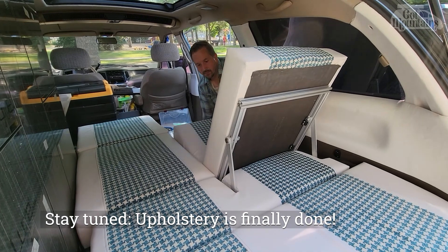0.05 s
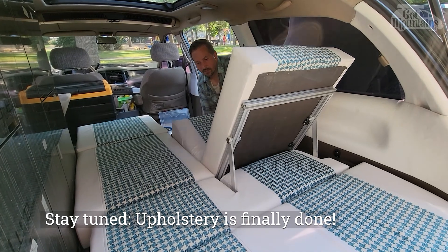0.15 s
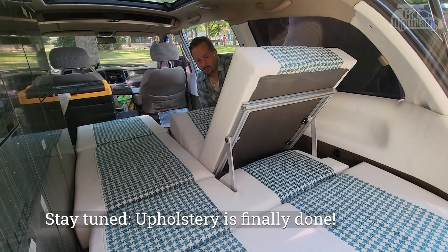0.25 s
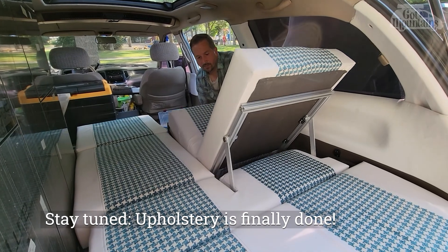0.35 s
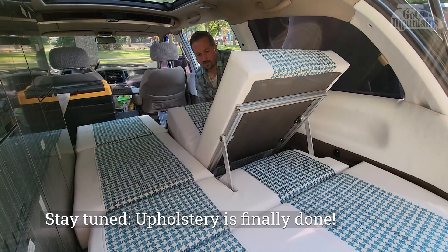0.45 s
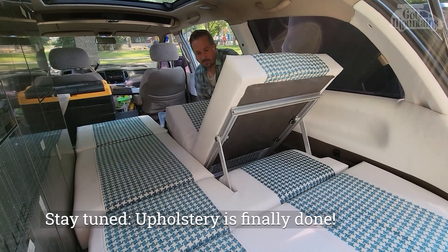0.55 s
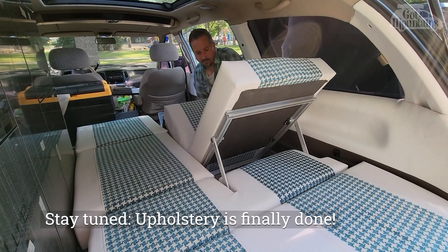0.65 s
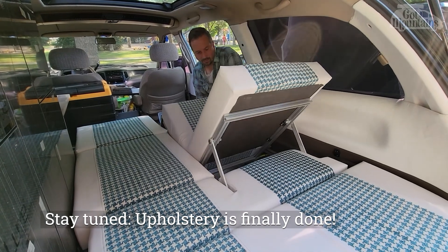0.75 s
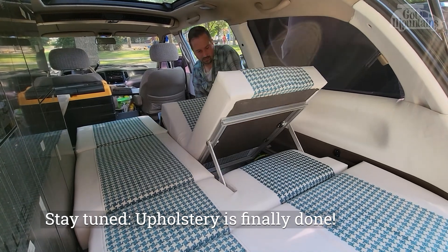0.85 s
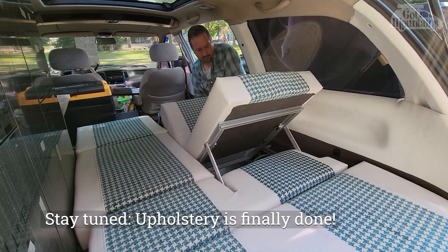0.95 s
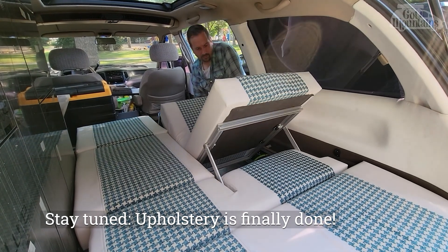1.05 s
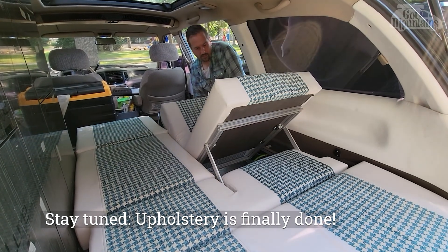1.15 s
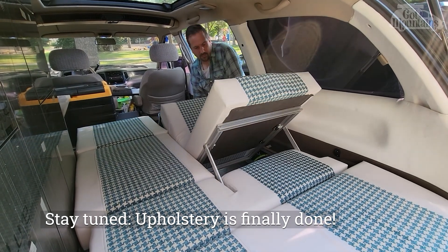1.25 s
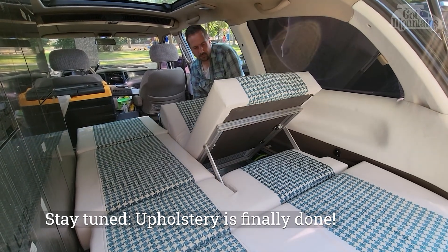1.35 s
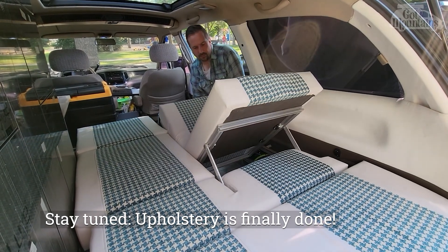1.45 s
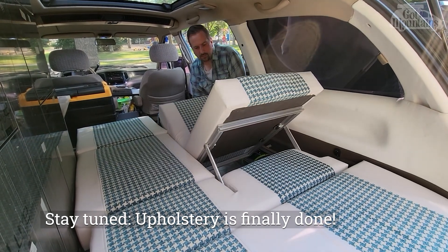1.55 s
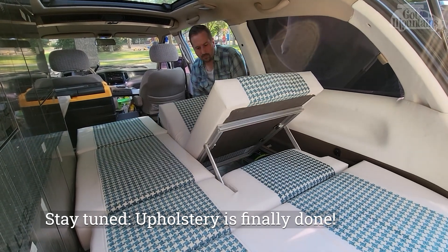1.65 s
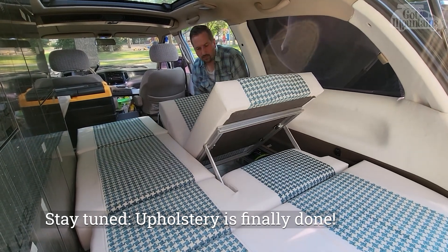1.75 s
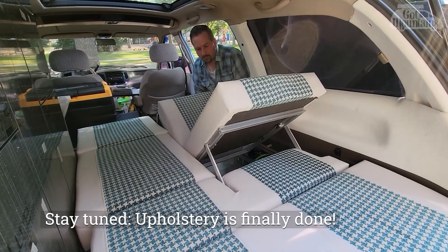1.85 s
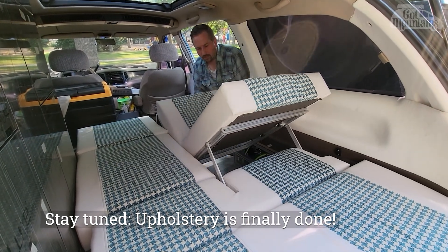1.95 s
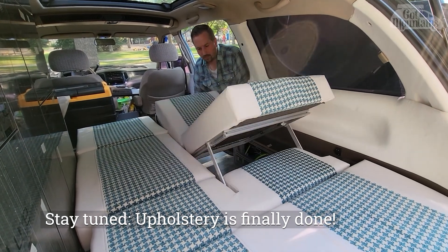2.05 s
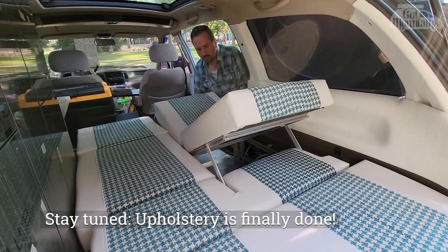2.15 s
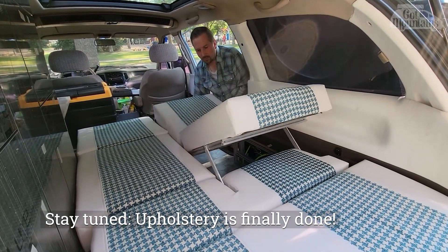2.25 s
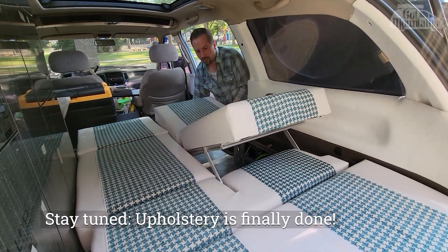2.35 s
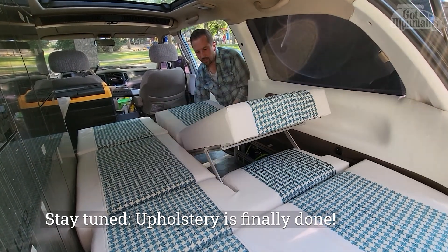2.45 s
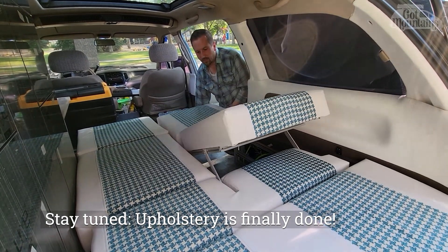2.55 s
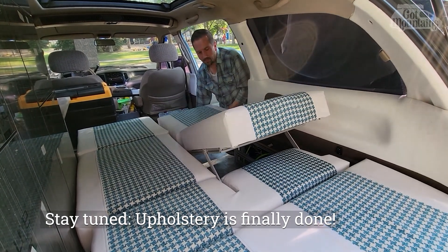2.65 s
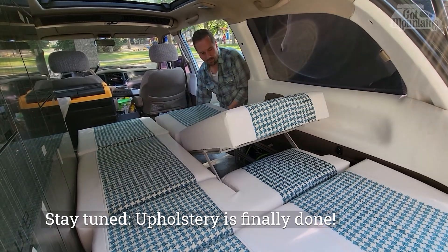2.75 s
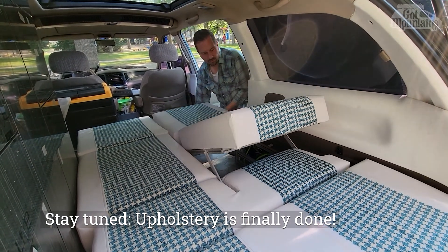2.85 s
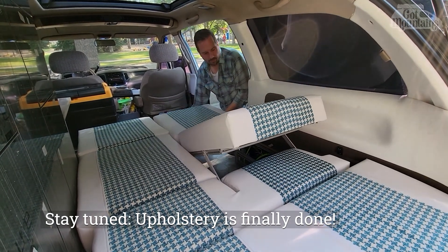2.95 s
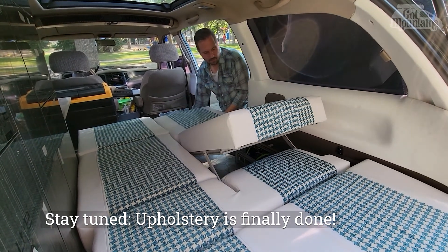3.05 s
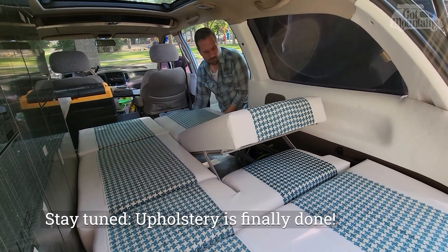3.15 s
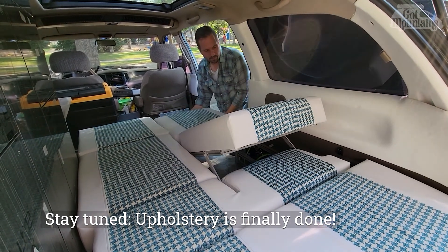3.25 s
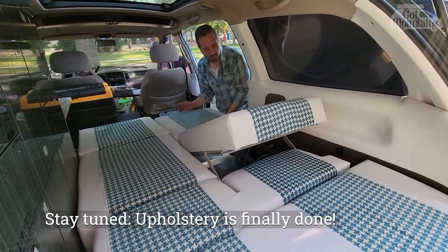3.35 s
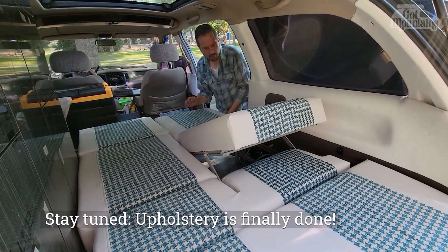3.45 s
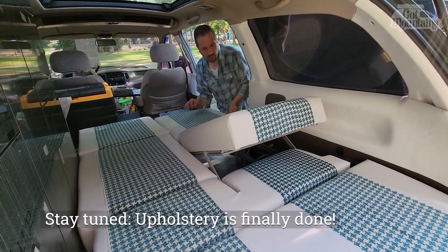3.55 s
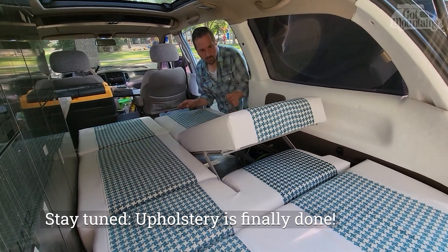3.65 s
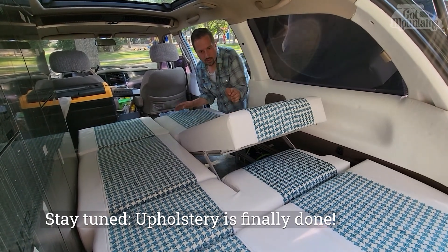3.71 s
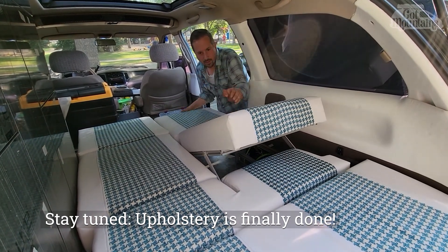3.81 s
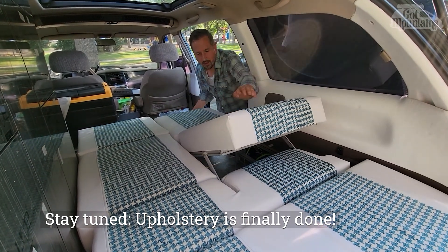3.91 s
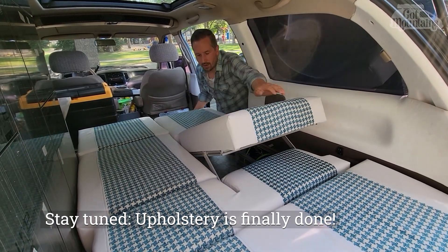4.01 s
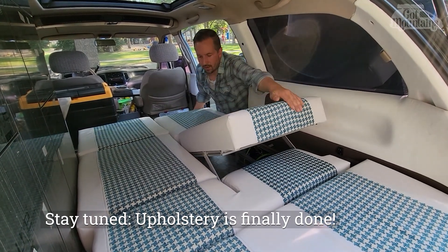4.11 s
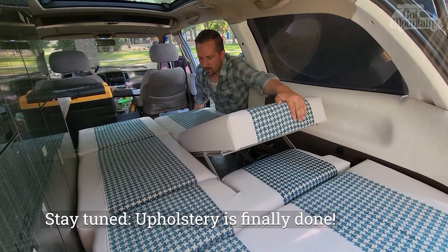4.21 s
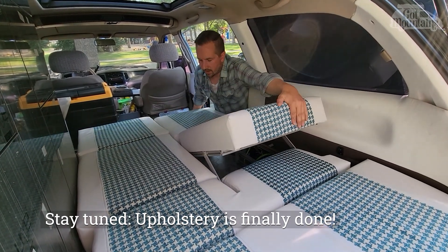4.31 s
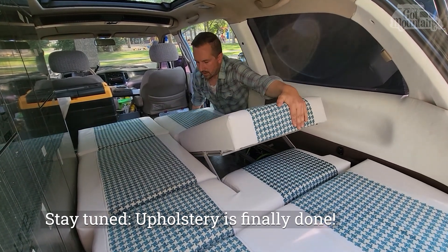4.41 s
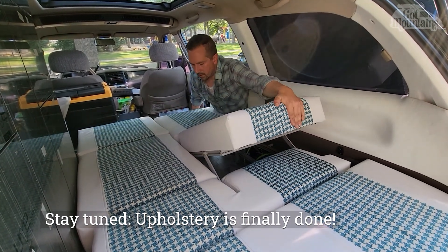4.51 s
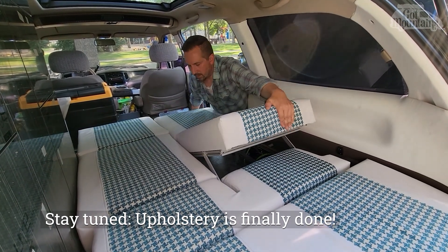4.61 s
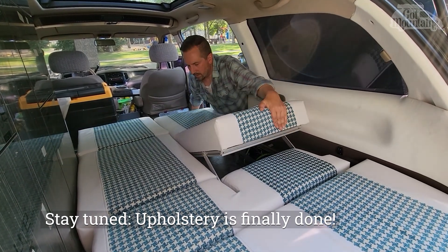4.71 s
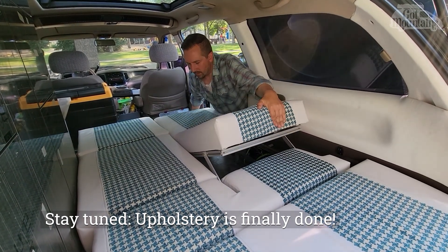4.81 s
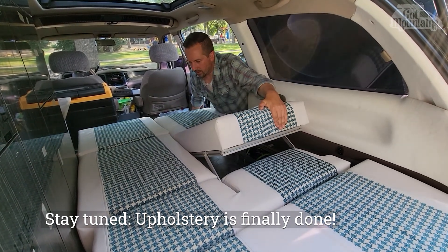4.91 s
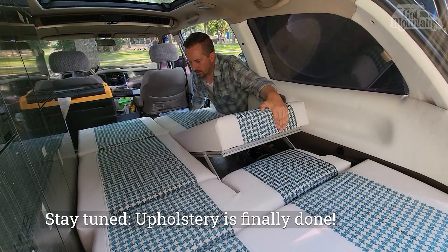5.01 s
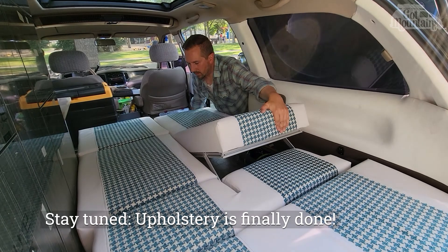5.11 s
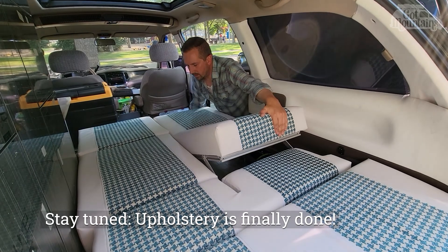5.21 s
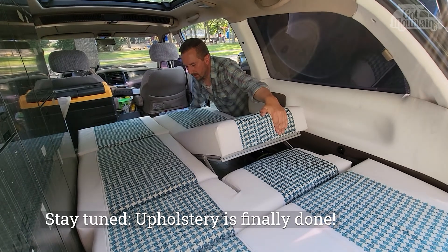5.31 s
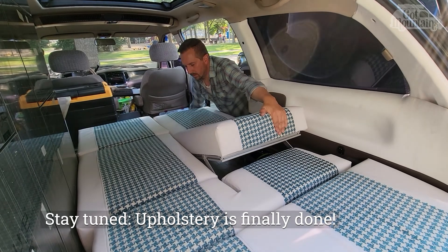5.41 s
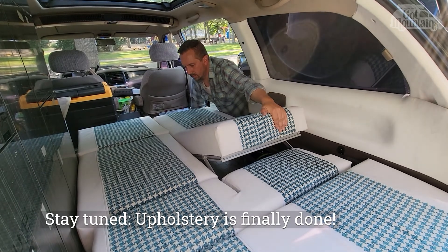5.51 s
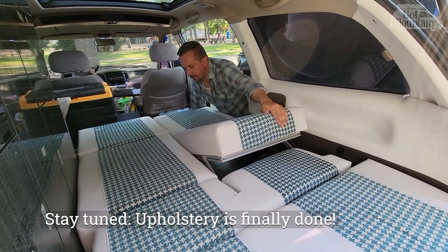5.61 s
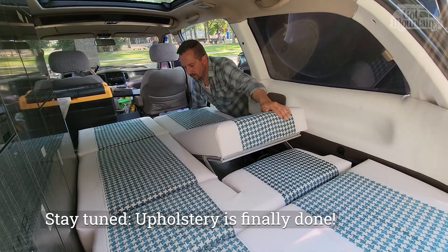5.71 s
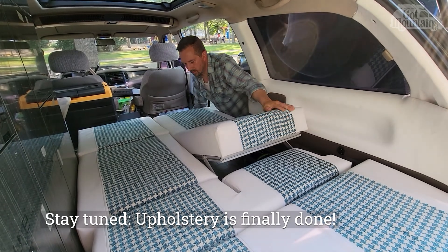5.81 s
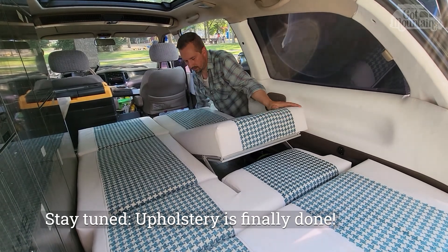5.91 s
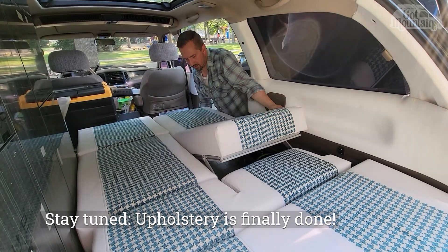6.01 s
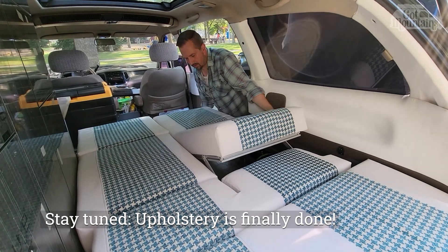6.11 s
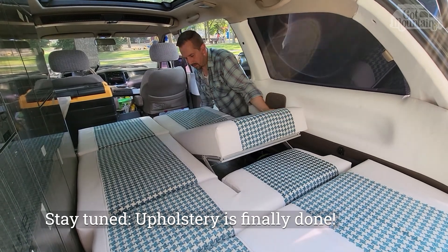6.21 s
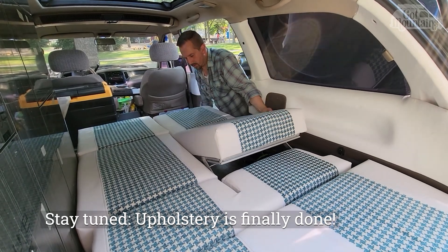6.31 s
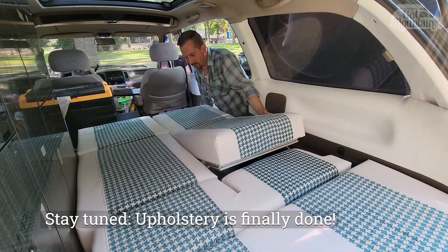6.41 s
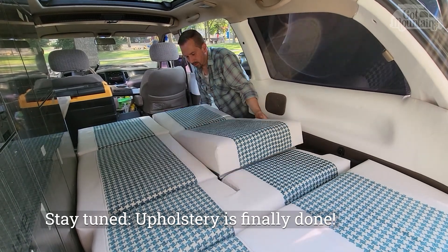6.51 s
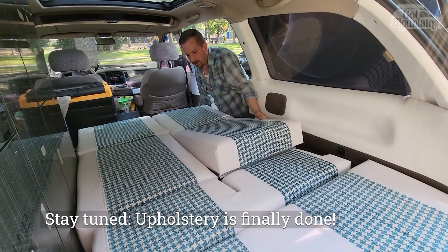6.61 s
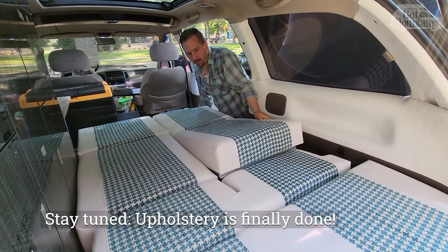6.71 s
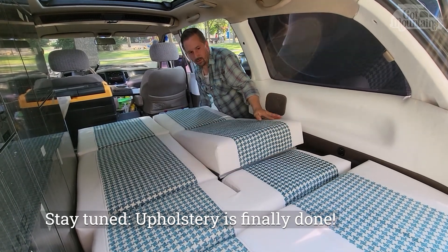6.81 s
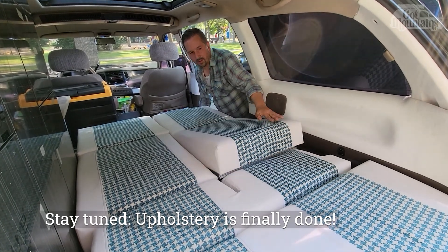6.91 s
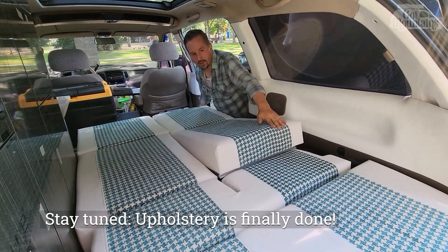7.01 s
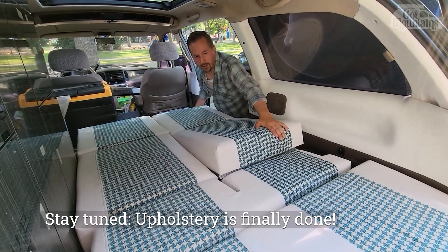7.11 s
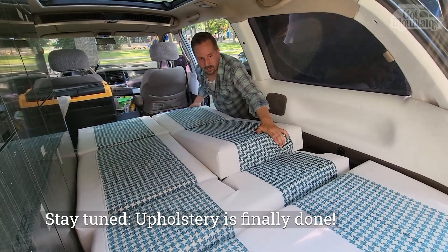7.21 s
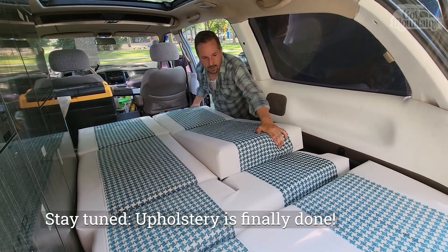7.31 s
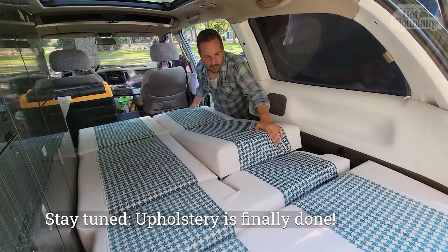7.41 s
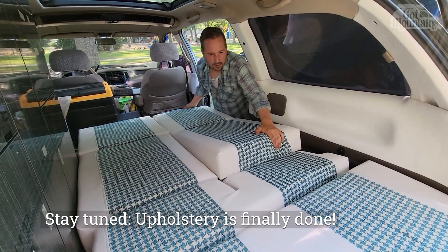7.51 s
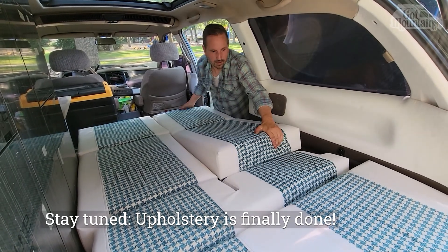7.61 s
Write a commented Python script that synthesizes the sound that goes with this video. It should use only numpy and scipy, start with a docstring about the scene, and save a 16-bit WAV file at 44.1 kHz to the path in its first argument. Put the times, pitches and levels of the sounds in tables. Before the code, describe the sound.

Padded bed boards thud and knock inside a van while a steel hinge frame clicks and creaks, ending in a heavy dull slam flat.

```python
"""Back of the cabin of a parked van: an upholstered folding bed is pushed flat.
Padded boards thud as damped bounces and knock as ringing modes; air modes of the cabin boom on after the thuds.
The steel hinge frame cracks, rings and ticks; cushions rub by stick-slip noise, and vinyl squeaks.
A palm swipes over ribbed cloth, the loaded frame grumbles, and shaped noise makes a faint outdoor hush
with a thin whine."""
import sys
import numpy as np
from scipy import signal
from scipy.fft import rfft, irfft
from scipy.io import wavfile
from scipy.ndimage import uniform_filter1d

SR = 44100
rng = np.random.default_rng(int(sys.argv[2]) if len(sys.argv) > 2 else 0)


def wav_record(signal):
    """Record a signal, one row per channel, as 16-bit PCM in the file named by sys.argv[1]."""
    frames = np.transpose(np.atleast_2d(signal))
    bounded = np.clip(frames, -1, 1)
    # unit amplitude maps onto the largest positive 16-bit level
    quanta = np.round(bounded * 32767).astype(np.int16)
    wavfile.write(sys.argv[1], SR, quanta)


N = 337806
TIME = np.arange(N) / SR
AGE = TIME[:SR // 2]  # time since the start of a blow, s


def undb(db):
    """Level law: decibels to amplitude gain."""
    return 10 ** (np.asarray(db) / 20)


def unit(x):
    """Normalization to rms 1."""
    return x / np.sqrt(np.mean(x ** 2))


def crest(x, size=350):
    """Short-time normalization: the loudest 8 ms get rms 1."""
    return x / np.sqrt(uniform_filter1d(x ** 2, size).max())


def colour(x, points):
    """Linear filtering by a spectrum of (Hz, dB) points, joined on a logarithmic frequency axis."""
    hz, db = np.transpose(points)
    bins = np.maximum(np.fft.rfftfreq(len(x), 1 / SR), 1)
    gain = undb(np.interp(np.log(bins), np.log(hz), db))
    return irfft(rfft(x) * gain, len(x))


def fade(t60):
    """Exponential decay: a fall of 60 dB in t60 seconds."""
    return np.exp(-np.log(1000) * AGE / t60)


def add(track, s, sound):
    """Superposition: mix a sound into the track at time s."""
    start = int(np.clip(s * SR, 0, N))
    track[start:start + len(sound)] += sound[:N - start]


def walk(rate, count=8192):
    """Random modulation: straight lines between normal random values, `rate` of them per second."""
    knots = rng.standard_normal(count)
    return np.interp(TIME * rate, np.arange(count), knots)


def ring(modes, scatter_db, detune):
    """Modal response, one row per mode; every blow meets the modes with its own strength, pitch and phase."""
    hz, db, t60 = np.transpose(modes)[:, :, None]
    size, shift, turn = rng.standard_normal((3, len(modes), 1))
    tone = np.sin(2 * np.pi * (hz * (1 + detune * shift) * AGE + turn))
    return undb(db + scatter_db * size) * fade(t60) * tone


def burst(points, t60, long_db=-60, long_t60=.2):
    """Double decay: coloured noise in two parts, a short one and a longer one, which may be the stronger."""
    decay = fade(t60) + undb(long_db) * fade(long_t60)
    return crest(colour(rng.standard_normal(len(AGE)), points) * decay)


def grains(rate, spread_db):
    """Impulse noise: many tiny random pulses of uneven size, as in stick-slip friction."""
    slips = rng.random(N) < rate / SR
    size_db = spread_db * np.minimum(rng.exponential(size=N), 4)
    return slips * rng.standard_normal(N) * undb(size_db)


def swells(rows):
    """Gaussian envelope: a smooth rise and fall for each row of (middle s, length s, dB)."""
    return sum(undb(db) * np.exp(-2 * ((TIME - s) / length) ** 2) for s, length, db in rows)


def thud(hz, rise_cycles, sag):
    """Damped spring-mass bounce; the foam makes it swell first, and the pitch sags as it unloads."""
    cycles = hz * AGE
    rise = cycles / rise_cycles
    swell = rise * np.exp(1 - rise)
    return swell * np.sin(2 * np.pi * (cycles + sag * (1 - np.exp(-cycles))))


# Padded boards bumping: start_s, level_db (relative), pitch_hz (where the thud settles),
# hardness_db (knock over thud, before the mix gains)
BUMPS = [(0.002, -30, 105, 4.5), (0.017, -25, 173, 0), (0.034, -28, 87, -7.5), (0.234, -28, 134, 0),
         (0.401, -40, 125, 0), (0.572, -30, 109.5, -4.5), (0.596, -26.5, 153, -13), (0.613, -31, 109, -7),
         (0.66, -27, 135, -3), (0.967, -23, 152, -0.5), (1.008, -31.5, 61, -5), (1.686, -34, 92, 0.5),
         (1.924, -23, 154, -11), (2.076, -37, 104, -0.5), (2.24, -28.5, 141, -4), (2.266, -30, 116, -5),
         (2.315, -29, 157, -3), (2.342, -33, 92, 0), (2.377, -37.5, 152, 6.5), (2.596, -15, 77, -8.5),
         (2.748, -26, 105, -1.5), (2.844, -29, 75.4, 9.5), (2.871, -34, 70, 2), (2.921, -16, 80.3, -3.5),
         (2.932, -29.5, 110, 6.5), (2.974, -16.5, 94.6, -17), (2.999, -16.5, 82.5, -9.5),
         (3.084, -24.5, 77.4, -7), (3.126, -29, 82.7, -14), (3.447, -37, 77.4, -5.5), (3.944, -36, 85, 0),
         (4.153, -42.5, 71, -2.5), (4.58, -33, 150, 4), (4.601, -33, 72.4, -21), (4.692, -30.5, 123, 1.5),
         (5.061, -36, 99, -5), (5.202, -29.5, 86.5, -6.5), (5.229, -26, 57, -9), (6.293, -26, 149, -5.5),
         (6.334, -20.5, 111, -14.5), (6.387, -20, 75, -6), (6.422, -14, 88, -12.5), (6.469, -12.5, 111, -8),
         (6.635, -19, 76.2, -11.5), (7.403, -34, 143, -5)]
# Ring of the bed boards: mode_hz, level_db (relative), t60_s
BOARD_MODES = [(134.4, -6.5, 0.71), (165.1, 2.5, 0.24), (208.4, 3, 0.084), (247.2, 5, 0.076),
               (301.6, -9.5, 0.29), (343.4, 2, 0.078), (392, -8, 0.16), (525.6, -16.5, 0.2)]
# Air modes of the cabin: mode_hz, gain_db (at resonance, before the boom gain), t60_s
CABIN_MODES = [(43.6, 15.5, 0.27), (67, 13, 0.27), (92.1, 9, 0.32), (121.3, 7, 0.43), (160, 3, 0.19)]
# Spectrum of the rap: frequency_hz, level_db (relative)
RAP_COLOUR = [(250, -51), (450, 6), (800, 4.5), (1100, -3.5), (1800, -11), (4000, -70)]
# a cushion drops back once after each bump, softly and at its own pitch
REBOUND_S, REBOUND_HZ, REBOUND_DB = 0.05584, 73.1, -18
# harder contact strengthens the rap relative to the knock: dB per dB of hardness
RAP_PER_HARDNESS = 0.75


def bumps(knocks, thud_db=-2, knock_db=-3.5, rap_db=-14, boom_db=-3, contact_s=0.0027,
          small_db=-2, small_hz=115, small_hardness_db=4):
    """Impact and resonance: a soft thud, a board knock and a rebound; each thud excites the cabin air."""
    soft, hard = np.zeros((2, N))
    contact = 1 - np.exp(-AGE / contact_s)
    small = [(s, db + small_db, small_hz, small_hardness_db) for s, db in knocks]
    for s, db, hz, hardness in BUMPS + small:
        for delay, drop, pitch in (0, 0, hz), (REBOUND_S, REBOUND_DB, REBOUND_HZ):
            add(soft, s + delay, undb(db + drop + thud_db) * thud(pitch, rise_cycles=0.82, sag=0.11))
        knock = db + hardness
        rap = knock + RAP_PER_HARDNESS * hardness
        board = crest(ring(BOARD_MODES, scatter_db=2, detune=.04).sum(0) * contact)
        add(hard, s, undb(knock + knock_db) * board)
        add(hard, s, undb(rap + rap_db) * contact * burst(RAP_COLOUR, t60=0.083, long_db=-7, long_t60=0.26))
    # dividing by half the decay's sum gives each air mode its listed gain at resonance
    air = sum(undb(db) * np.cos(2 * np.pi * hz * AGE) * fade(t60) * 2 / fade(t60).sum()
              for hz, db, t60 in CABIN_MODES)
    boom = undb(boom_db) * signal.fftconvolve(soft, air)[:N]
    return soft + hard + boom


# Hinge frame clicks: start_s, level_db (relative), brightness_db (edge over click, before the mix gains)
CLICKS = [(0.0024, -48.5, 15.5), (0.0203, -38.5, 0.5), (0.083, -54, 14), (0.092, -51.5, 9),
          (0.1595, -45, 0), (0.6674, -40, -11), (0.9668, -19.5, -6), (0.9726, -23, -5.5),
          (1.284, -45.5, -25), (2.3382, -45.5, 17), (2.435, -53, 9), (2.746, -28.5, -13),
          (2.8475, -33, 0.5), (2.8578, -26, -10), (2.8738, -41, -1), (2.9374, -46, -5), (3.001, -50, -4),
          (4.6931, -31, -4), (5.031, -41, -3), (5.2043, -41.5, -2), (6.4238, -49, 10.5), (6.5105, -32, 0),
          (7.1194, -35.5, -16), (7.1453, -44, -12), (7.2413, -40, -15), (7.468, -39, -22),
          (7.6001, -41, -6), (7.6303, -34.5, -7)]
# Ring of the steel frame: mode_hz, level_db (relative within the low or the upper modes), t60_s
FRAME_MODES = [(285.4, 2, 0.16), (882, -6, 0.089), (924, 1.5, 0.088), (1011, -0.5, 0.079),
               (1448, 1.5, 0.067), (1777, -3, 0.062), (1953, -4, 0.081), (2060, 1, 0.03), (2277, -8, 0.15),
               (2483, -1, 0.05), (2680, 0.5, 0.025), (2635, -8, 0.093), (3180, -4, 0.048),
               (3270, -42.5, 0.028), (6640, -20.5, 0.054)]
# A hinge spring singing briefly: start_s, pitch_hz, level_db, t60_s
PINGS = [(5.203, 2715, -51.5, 0.2), (6.454, 358.7, -30, 0.11), (6.509, 2840, -34, 0.029)]
# Spectra of the crack and of its bright edge: frequency_hz, level_db (relative)
CRACK_COLOUR = [(600, 18.5), (1400, 15), (2700, -18), (3400, -20.5), (5000, -11), (9000, -56.5)]
EDGE_COLOUR = [(2500, 10), (4000, 5), (5200, -1.5), (6500, 4.5), (8000, -6.5), (11000, -23), (15000, -38)]
# the tubes (low modes) ring freely while the backrest stands; once it has folded, the cushion damps them
FOLDED_S, DAMPED_DB = 1.8, -9.5


def hinge(ticks, upper_db=-10, tube_db=-7, crack_db=-10, edge_db=-8, split_hz=1650,
          tick_db=-4, tick_brightness_db=-7):
    """Impulsive excitation of modes: steel links slip into place with a bright crack and the frame rings."""
    out = np.zeros(N)
    low = np.array(FRAME_MODES)[:, 0] < split_hz
    # the link scrapes for a moment before it seats
    contact = 1 - np.exp(-AGE / .001)
    for s, hz, db, t60 in PINGS:
        # neighbouring coils ring at close pitches and beat
        coils = ring([(hz, 0, t60)] * 6, scatter_db=1, detune=.035).sum(0)
        add(out, s, undb(db) * contact * crest(coils))
    faint = [(s, db + tick_db, tick_brightness_db) for s, db in ticks]
    for s, db, brightness in CLICKS + faint:
        tube = db + DAMPED_DB * (s > FOLDED_S)
        modes = contact * ring(FRAME_MODES, scatter_db=1.5, detune=.003)
        add(out, s, undb(tube + tube_db) * crest(modes[low].sum(0)))
        add(out, s, undb(db + upper_db) * crest(modes[~low].sum(0)))
        add(out, s, undb(db + crack_db) * contact * burst(CRACK_COLOUR, t60=0.075))
        edge = burst(EDGE_COLOUR, t60=0.028, long_db=13.5, long_t60=0.074)
        add(out, s, undb(db + brightness + edge_db) * edge)
    return out


# heavy knocks shake the loose links: rattles fall within RATTLE_S, RATTLE_DB from the knock before the tick gain
RATTLE_ABOVE_DB, RATTLE_S, RATTLE_DB = -26.5, .06, -21
# blows with no more hardness than this land on padding and shake nothing
PADDED_DB = -9.5


def rattles(count=3):
    """Secondary impacts: loose links chatter after each heavy, hard knock; rows of (s, dB)."""
    chance = rng.random((len(BUMPS), count))
    heavy = [(s, db + hardness, lates) for (s, db, hz, hardness), lates in zip(BUMPS, chance)
             if db + hardness > RATTLE_ABOVE_DB and hardness > PADDED_DB]
    return [(s + RATTLE_S * late, knock + RATTLE_DB) for s, knock, lates in heavy for late in lates]


# Vinyl squeaking as it lets go: middle_s, length_s, level_db (fundamental, before flutter),
# pitch_hz (at the middle), glide_hz_per_s
SQUEAKS = [(0.634, 0.044, -46, 730, 597), (1.891, .016, -37.5, 638, 5), (1.918, .03, -41.5, 830, -4500)]


def squeaks(rough=0.073, overtone_db=-11, flutter_db=3):
    """Periodic stick-slip: vinyl catches fast enough to give a rough gliding tone with weak overtones."""
    out = np.zeros(N)
    for s, length, level, hz, glide in SQUEAKS:
        pitch = (hz + glide * np.clip(TIME - s, -length, length)) * (1 + rough * walk(700))
        phase = 2 * np.pi * np.cumsum(pitch) / SR
        tone = sum(undb(overtone_db * k) * np.sin((k + 1) * phase) for k in range(3))
        out += swells([(s, length, level)]) * tone
    return out * undb(flutter_db * walk(110))


# Cushion edges creaking, and a hand smoothing the cover down: middle_s, length_s, level_db (before the flicker)
CREAKS = [(0.635, 0.053, -50), (1.462, 0.077, -50.5), (1.89, 0.05, -49), (2.39, 0.014, -52),
          (2.282, 0.074, -49.5), (4.763, 0.021, -52), (4.839, 0.0085, -64), (7.376, 0.064, -53.5),
          (7.62, 0.037, -52.5)]
RUBS = [(1.36, 0.066, -62.5), (1.77, 0.11, -69), (7.165, 0.11, -58), (7.38, 0.065, -58),
        (7.5, 0.048, -58.5), (7.62, 0.04, -50)]
# Short swells of hiss and very high, thin noise: middle_s, length_s, level_db (before flicker and mix gain)
HISS_SWELLS = [(0.1, 0.33, -73.5), (0.76, 0.22, -66.5), (1.95, 0.14, -64), (2.96, 0.043, -61),
               (3.53, 0.072, -77), (5.884, 0.16, -63), (6.748, 0.066, -70.5)]
# Spectra of the creak, the rub, the hiss and the thin top band: frequency_hz, level_db (relative)
CREAK_COLOUR = [(220, -21), (360, 3), (520, -6), (640, 0), (820, -3.5), (1100, -30), (2500, -11.5),
                (6000, -43)]
RUB_COLOUR = [(300, -2), (450, -7.5), (780, 5.5), (1250, 4), (1900, 4), (2700, 1), (3400, -14), (4500, -25)]
HISS_COLOUR = [(2600, -68), (3400, 7.5), (4150, 2), (4900, -1.5), (5800, -2.5), (6600, 4), (7400, 3.5),
               (8400, -10), (9600, -5.5), (11000, -28), (13000, -37)]
TOP_COLOUR = [(9000, -11), (11000, -12), (12500, -1), (15500, -4)]


def cushions(sliding, rub_db=5, top_db=-9, drag_db=3, swell_top_db=1, flicker_db=3.0):
    """Dry friction: cushion edges stick and slip, with a fine hiss and a thin top band of noise."""
    creak = unit(colour(grains(rate=900, spread_db=1), CREAK_COLOUR))
    rub = unit(colour(grains(rate=1300, spread_db=2), RUB_COLOUR))
    hiss = unit(colour(grains(rate=15000, spread_db=2), HISS_COLOUR))
    top = unit(colour(grains(rate=11000, spread_db=3), TOP_COLOUR))
    out = sliding * (undb(drag_db) * creak + undb(rub_db) * rub + hiss + undb(top_db) * top)
    out += swells(CREAKS) * creak + swells(RUBS) * rub
    out += swells(HISS_SWELLS) * (undb(swell_top_db) * top + hiss)
    return out * undb(flicker_db * walk(45))


# Envelope of the hand swiping over the cover: time_s, level_db (scrape, before the flicker)
SWIPE = [(4.50, -82), (4.535, -49.5), (4.585, -37.5), (4.63, -44.5), (4.67, -44), (4.706, -43),
         (4.735, -60.5), (4.80, -60)]
# Weave ribs passing under the hand: time_s, ribs_per_s (before the uneven spacing)
RIBS = [(4.55, 2600), (4.595, 2400), (4.62, 1500), (4.70, 1400)]
# Spectrum of the scrape: frequency_hz, level_db (relative)
SWIPE_COLOUR = [(240, -10.5), (400, -2.5), (520, -28), (720, -8.5), (1000, -20.5), (1400, -24.5),
                (2100, -17), (2600, -7.5), (3500, -21), (4210, -11), (4800, -25), (6790, -18),
                (10300, -38.5), (13000, -29.5), (15800, -29)]


def swipe(flicker_db=0.5, zip_db=-5):
    """Periodic excitation: a palm crosses a ribbed weave; the zipping pitch falls as the hand slows."""
    s, db = np.transpose(SWIPE)
    spacing = 1 + .12 * walk(900)
    rib_rate = np.interp(TIME, *np.transpose(RIBS)) / spacing
    phase = 2 * np.pi * np.cumsum(rib_rate) / SR
    zipping = undb(zip_db) * unit(np.sin(phase) * undb(6.3 * walk(120)))
    scrape = unit(colour(grains(rate=15000, spread_db=1.2), SWIPE_COLOUR))
    envelope = np.interp(TIME, s, undb(db), left=0, right=0)
    return envelope * undb(flicker_db * walk(70)) * (scrape + zipping)


# Pushes that move the bed: start_s, end_s, load_db (on the frame), sliding_db (of the covers),
# both before the mix gains of what they drive
PUSHES = [(0, .2, -46, -63), (0.29, 0.575, -64, -67), (0.567, 0.97, -54.5, -65), (1.31, 1.52, -47.5, -64),
          (1.64, 2.04, -47.5, -63), (2.192, 2.438, -42, -65.5), (2.79, 3.035, -34.5, -61.5),
          (3.625, 3.88, -58.5, -69), (4.784, 5.3, -43.5, -78.5), (6.336, 6.49, -30, -59),
          (7.08, 7.66, -44.5, -66.5)]
# length of the ramp centred on the start; time constant of the letting go
ATTACK_S, RELEASE_S = 0.051, .085


def effort():
    """Force envelopes: load and sliding as gains; each push builds up, holds and lets go."""
    load, sliding = np.zeros((2, N))
    for start, end, load_db, slide_db in PUSHES:
        build = np.clip((TIME - start) / ATTACK_S + .5, 0, 1)
        shape = build * np.exp(-np.maximum(TIME - end, 0) / RELEASE_S)
        load = load + undb(load_db) * shape
        sliding = sliding + undb(slide_db) * shape
    return load, sliding


# candidate moments for small random knocks and ticks; those under too little load stay silent
KNOCKS_PER_S, TICKS_PER_S = 9, 5


def settling(load, rate, spread_db):
    """Random stress release: one moment per 1/rate s at which a loaded frame gives; rows of (s, dB)."""
    chance = rng.random((128, 2))
    times = (np.arange(len(chance)) + chance[:, 0]) / rate
    rows = [(s, 20 * np.log10(load[int(s * SR)] + 1e-9) + spread_db * (size - 1))
            for s, size in zip(times, chance[:, 1]) if s < TIME[-1]]
    return [(s, db) for s, db in rows if db > -60]


# Spectrum of the shuddering frame: frequency_hz, level_db (relative)
RUMBLE_COLOUR = [(20, -26), (35, -14), (55, 8.5), (100, 6), (160, -4.5), (250, -11), (340, -6.5),
                 (520, -29), (900, -70.5)]


def grumble(load, db=-1):
    """Forced vibration: the loaded frame shudders on the van floor, as low noise that follows the load."""
    return undb(db) * load * unit(colour(rng.standard_normal(N), RUMBLE_COLOUR))


# Spectrum of the outdoor hush inside the cabin: frequency_hz, level_db (relative)
HUSH_COLOUR = [(20, -29), (38, 10.5), (60, 12), (100, 8), (200, -6), (420, -6), (560, -9), (780, -9.5),
               (1250, -11.5), (1900, -12), (2700, -12.5), (3500, -18), (4150, -17), (5000, -23.5),
               (6600, -19), (8400, -30.5), (11000, -37.5), (15500, -36.5)]


def hush(db=-50, drift_db=3.4):
    """Broadband ambient noise: a soft outdoor hush drifts in through the open door."""
    return undb(db + drift_db * walk(2.667)) * unit(colour(rng.standard_normal(N), HUSH_COLOUR))


# Faint whine in the background: pitch_hz, level_db (rms, before the wavering)
WHINE = [(770, -74), (1535, -69.5), (1595, -74), (2245, -80)]


def whine():
    """Narrow-band modulation: thin tones behind the hush waver slightly in level and phase."""
    return sum(undb(db + 1.5 * walk(14)) * np.sqrt(2) * np.sin(2 * np.pi * hz * TIME + 1.3 * walk(20))
               for hz, db in WHINE)


def ports(source, width):
    """Diffuse-field decorrelation: bass reaches both ports alike; higher up, reflections make them differ."""
    # the pressure difference between the ports is a quarter cycle out of step with the pressure
    mid = source()
    side = colour(signal.hilbert(source()).imag, width)
    return np.array([mid + side, mid - side])


# Side against mid, for the diffuse sounds and for the blows: frequency_hz, gain_db
DIFFUSE_WIDTH = [(80, -22.5), (230, -9), (450, -1), (950, 8), (1400, 5.5), (2400, -0.5)]
BLOW_WIDTH = [(180, -21.5), (450, -4.5), (700, 0.5), (950, -3), (1350, 6), (2200, 1)]
# Left against right: frequency_hz, difference_db
LEAN = [(60, -0.5), (110, -1), (200, 0.5), (380, -4), (700, -1.5), (1290, 1), (2380, 2), (4400, -4.5),
        (8120, 0.5), (15000, 3)]


def scene():
    """Direct and diffuse sound: blows arrive mostly straight from the bed, rubbing and hush from all around."""
    load, sliding = effort()
    diffuse = ports(lambda: cushions(sliding) + grumble(load) + swipe() + hush() + whine(), DIFFUSE_WIDTH)
    knocks = settling(load, KNOCKS_PER_S, spread_db=5)
    ticks = settling(load, TICKS_PER_S, spread_db=5.5)
    blows = ports(lambda: bumps(knocks) + hinge(ticks + rattles()) + squeaks(), BLOW_WIDTH)
    # each side takes half of the left-right difference
    return np.array([colour(x, [(hz, sign * db / 2) for hz, db in LEAN])
                     for x, sign in zip(blows + diffuse, (1, -1))])


TOP_HZ = 15900


def record(dry):
    """Band limiting: a steep elliptic low-pass cuts the treble above TOP_HZ."""
    return signal.sosfilt(signal.ellip(10, .2, 80, TOP_HZ, fs=SR, output="sos"), dry)


dry = scene()
out = record(dry)
wav_record(out)
```